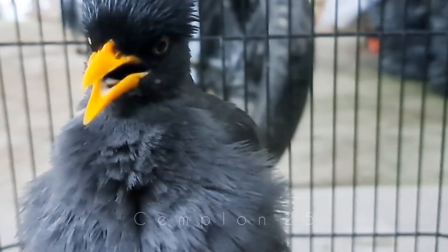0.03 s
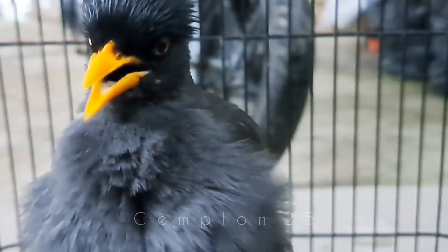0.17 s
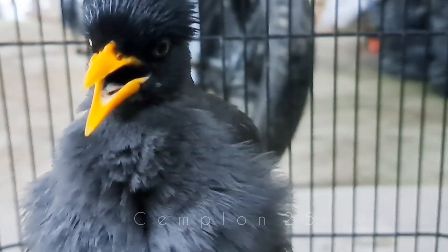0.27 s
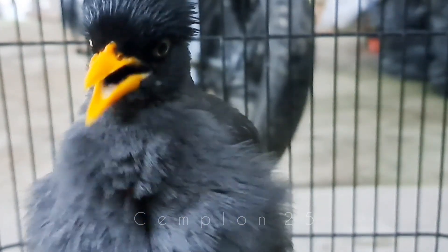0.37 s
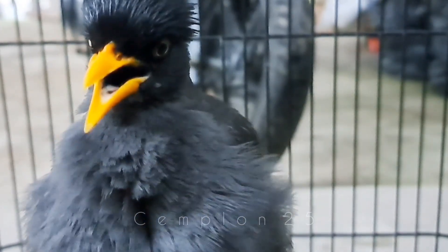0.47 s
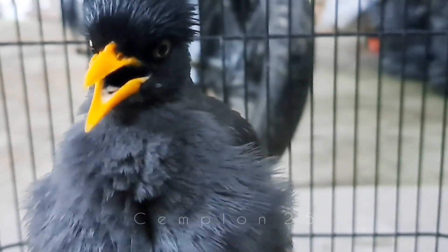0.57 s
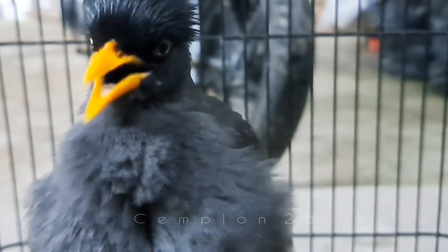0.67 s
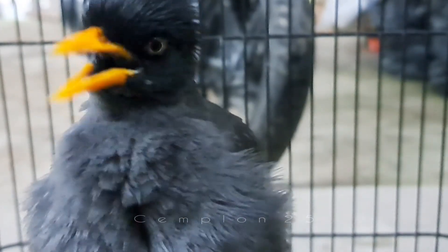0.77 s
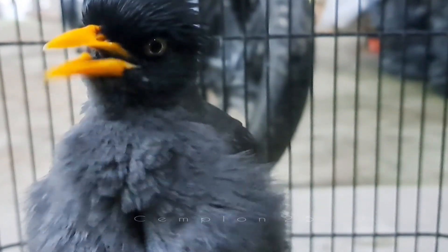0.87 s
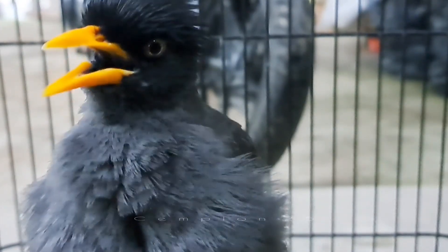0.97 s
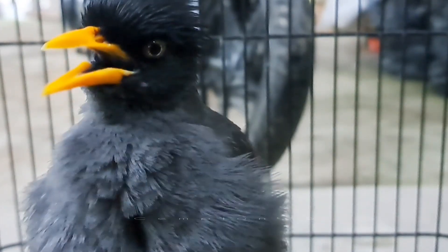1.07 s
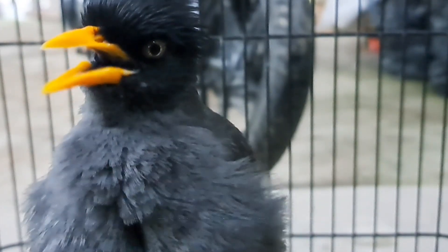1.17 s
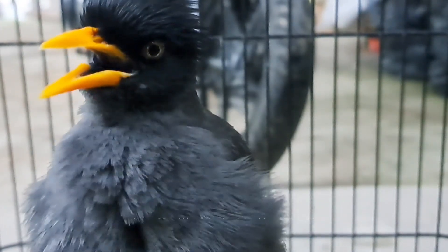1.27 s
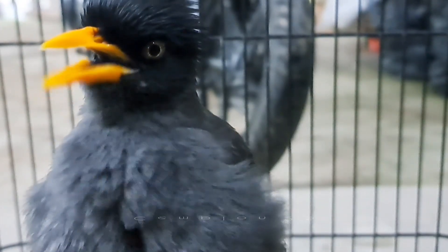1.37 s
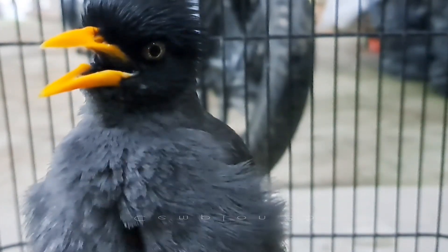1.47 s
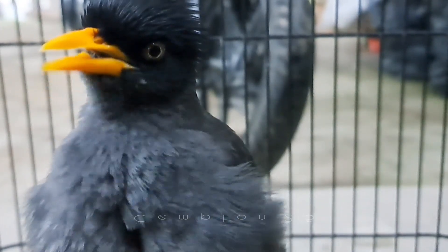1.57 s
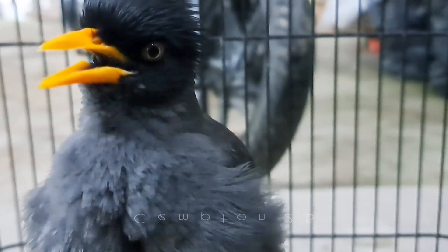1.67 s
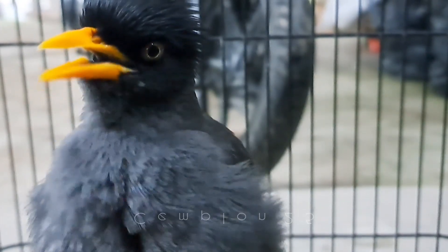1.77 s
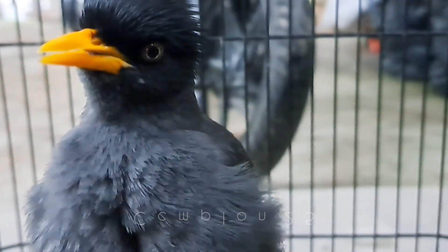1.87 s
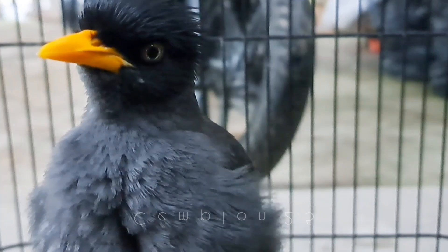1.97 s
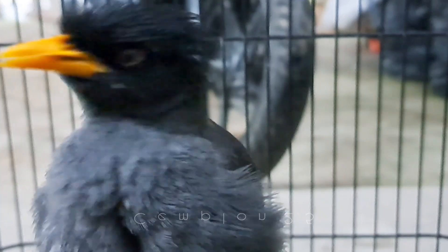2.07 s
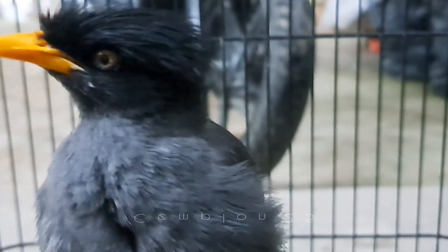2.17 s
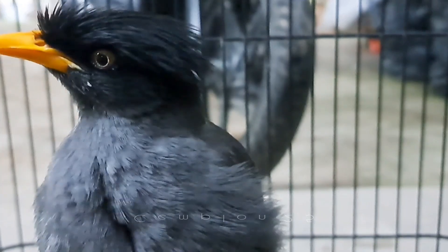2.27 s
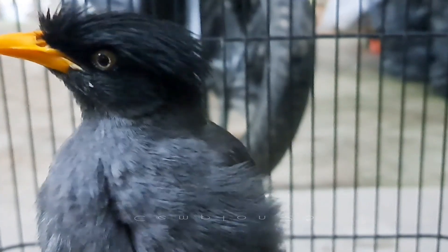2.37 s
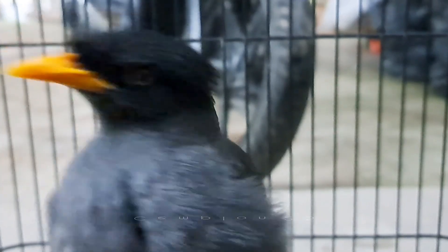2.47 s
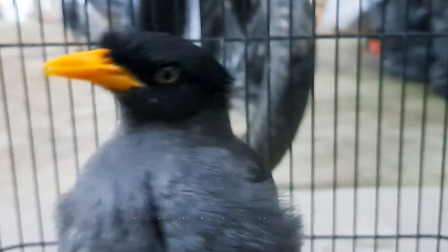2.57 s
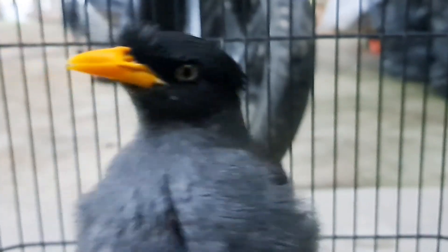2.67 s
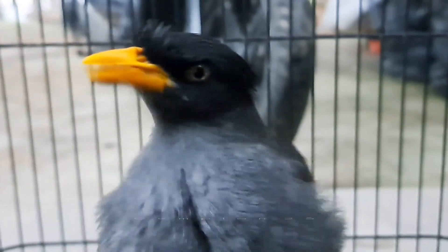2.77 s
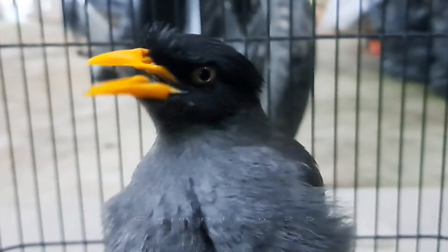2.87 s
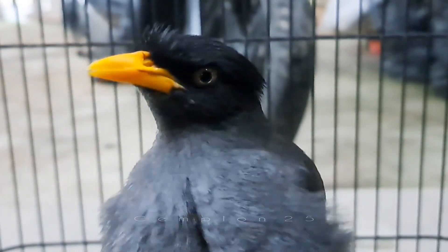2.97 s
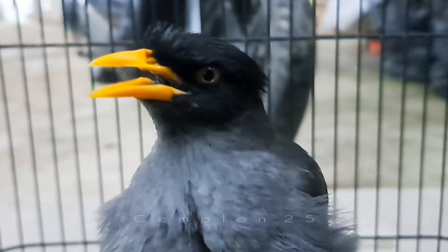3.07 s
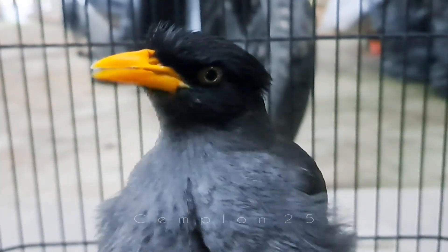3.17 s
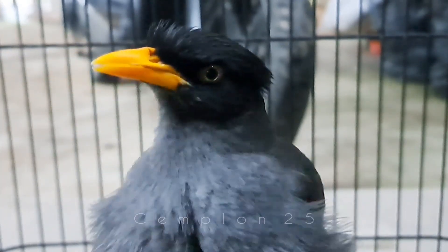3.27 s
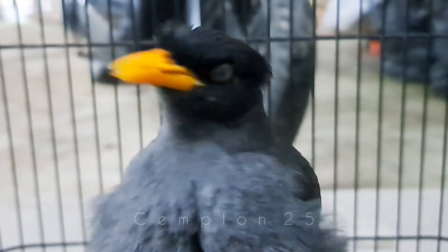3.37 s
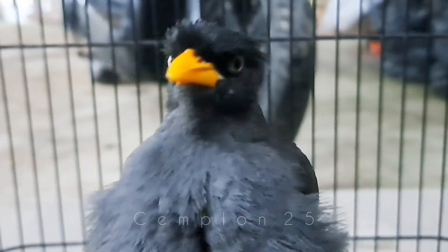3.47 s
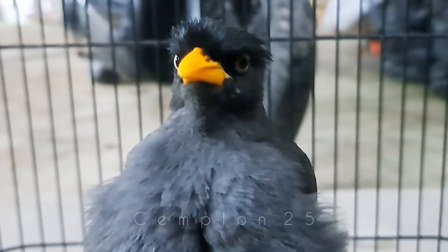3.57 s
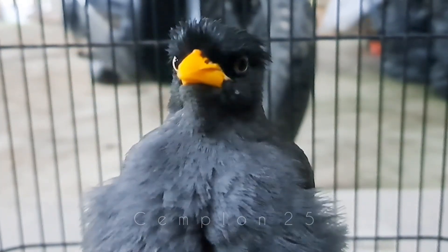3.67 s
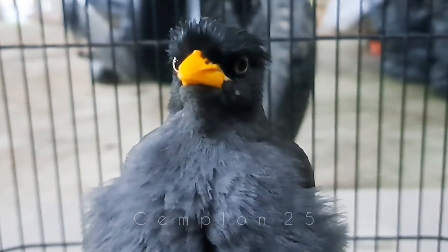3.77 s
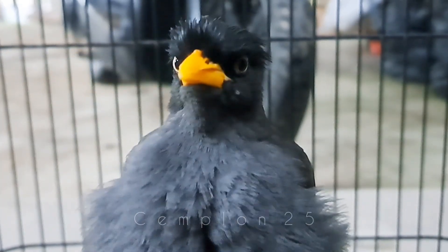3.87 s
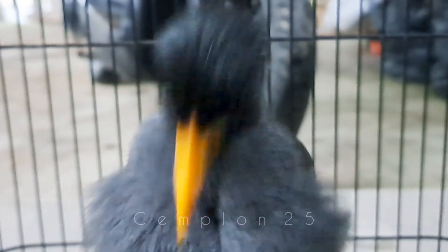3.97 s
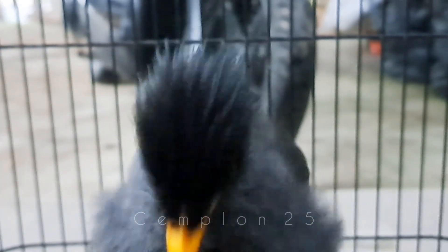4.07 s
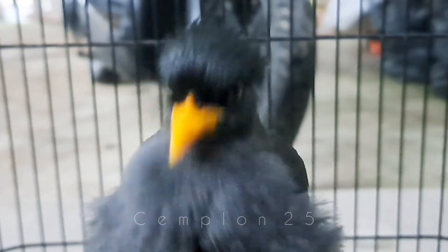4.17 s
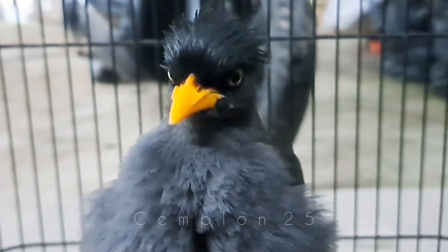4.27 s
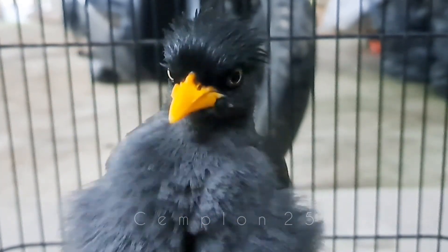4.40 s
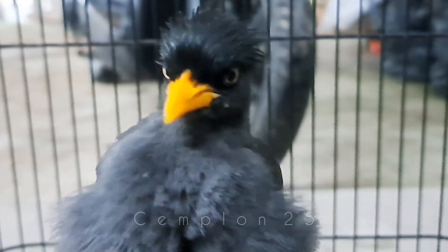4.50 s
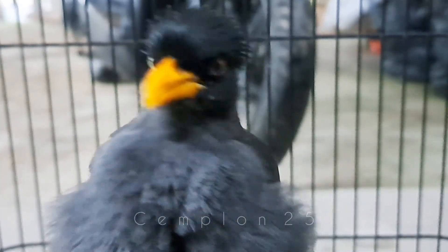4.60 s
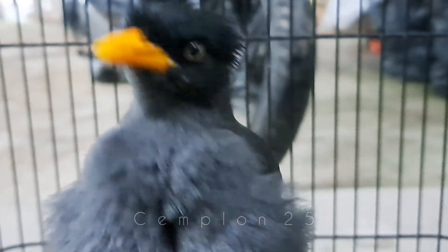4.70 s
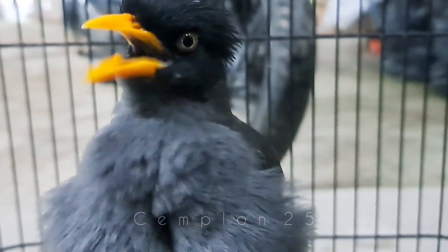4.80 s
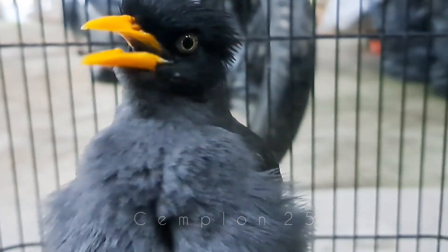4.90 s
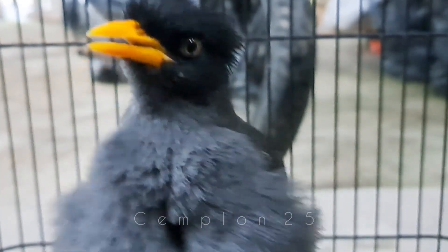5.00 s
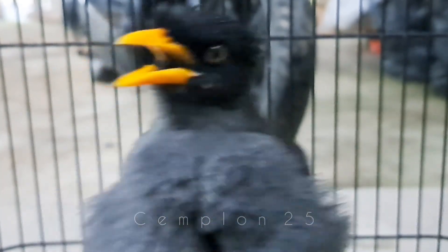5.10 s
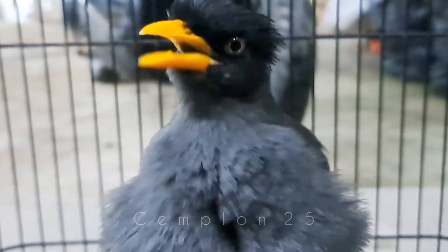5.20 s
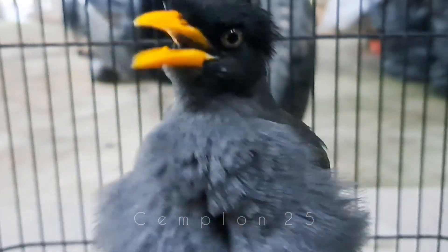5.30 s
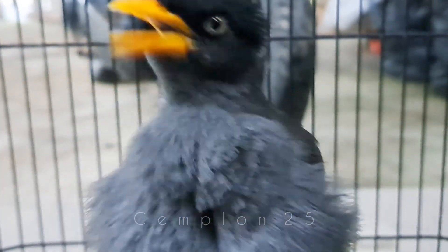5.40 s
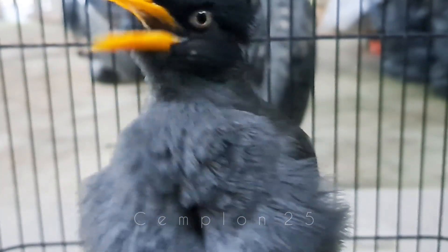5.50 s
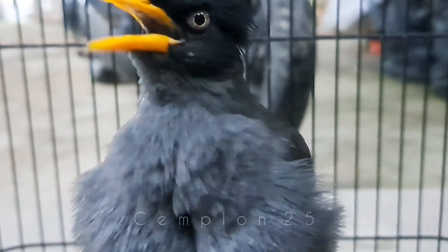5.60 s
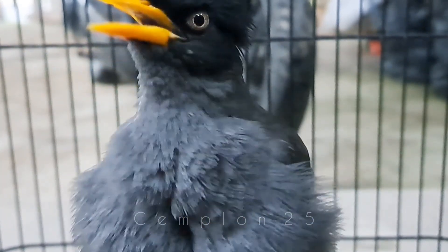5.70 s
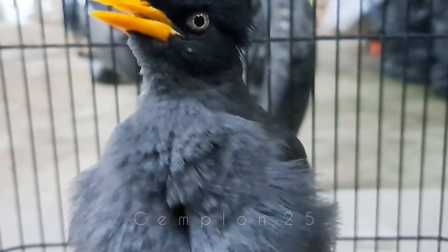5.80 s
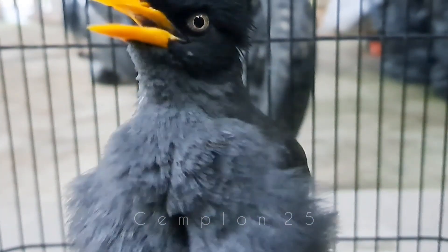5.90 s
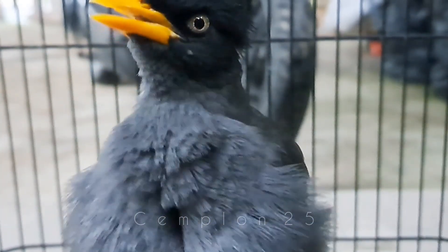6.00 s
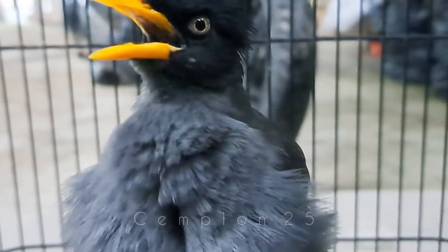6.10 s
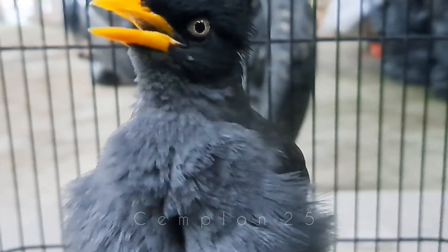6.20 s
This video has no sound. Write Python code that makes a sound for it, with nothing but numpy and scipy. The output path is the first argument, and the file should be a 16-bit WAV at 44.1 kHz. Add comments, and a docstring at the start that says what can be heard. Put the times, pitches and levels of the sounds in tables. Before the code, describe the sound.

Seven bright, nasal bird squawks, about four a second, slowly sinking in pitch, end in a quick trill. The near bird then only rattles clicks and warbles quietly, as another bird's buzzing chatter comes from further off to the right and grows louder. After a soft perch thud, the near bird returns with chirps and piercing up-and-down whistles. Close microphones, a reverberant room, low rumble and faint distant whistles.

```python
"""Caged myna and a chattering neighbour

A myna sings in a wire cage close to a pair of microphones: seven arched squawks, rattling clicks and a warble,
then loud swooping whistles. Each voice is a tone with overtones whose pitch and loudness follow tables.
A second bird, its pitch shaken fast, chatters harshly across the room between the loud phrases.
Decaying noise makes the echoes of cage and walls; a low hum and room noise lie underneath.
"""
import sys
import numpy as np
from scipy import signal
from scipy.fft import rfft, irfft
from scipy.io import wavfile
from scipy.ndimage import uniform_filter1d, map_coordinates

SR = 44100
rng = np.random.default_rng(int(sys.argv[2]) if len(sys.argv) > 2 else 0)


def transcribe(signal):
    """Save signal, clipped to [-1, 1], as a 16-bit WAV file at the path in sys.argv[1]."""
    frames = np.atleast_2d(signal).T
    limited = np.clip(frames, -1, 1)
    pcm = np.round(limited * 32767).astype(np.int16)
    wavfile.write(sys.argv[1], SR, pcm)


N = 275604
TOP_HZ = 16200  # upper limit of the sound


# arched squawks: [start t/s, length t/s, top f/Hz of the arch, rise t/s, crest t/s after the start,
# starting level/dB, starting treble level/dB, fundamental level/dB]
SQUAWKS = [(.016, 0.19, 2294, 0.031, 0.11, -14, -15.5, 0),
           (0.254, .1836, 2213, 0.017, .052, -13, -13.5, -2),
           (0.491, 0.19, 2139, 0.02, 0.036, -13.5, -11.5, -3.5),
           (.737, 0.19, 2131, 0.01974, 0.00276, -14, -11, -3),
           (0.977, .1876, 1939, .0155, .113, -14, -11.5, -5.5),
           (1.217, 0.17, 1790, 0.018, 0.071, -13, -10.5, -7),
           (1.437, 0.17, 1769, 0.01182, 0.14, -13, -10, -7.5)]
# how well the throat passes each overtone: [f/Hz, level/dB]
THROAT = [(900, 4), (1900, -1), (2800, 12), (3500, 7), (4500, -5), (5300, -7), (7000, -103)]
# treble of the squawks: [f/Hz, level/dB]
BEAK = [(3800, -17), (5200, -0.5), (6300, 5), (7500, -1.5), (8800, 4), (10400, -6), (11400, -4.5),
        (14000, -5), (16000, -17.5)]
# how strongly the throat passes a squawk's second harmonic: [f/Hz, level/dB]
THROAT_GAIN = [(1200, -11.5), (2000, -4), (2500, -0.5), (3200, 1.5), (3500, -3.5), (3780, 8), (4050, -5.5),
               (4280, 1.5), (4570, -7)]
# the pitch starts low by a share, sags either side of its crest and collapses just before the end
RISE_SHARE, SAG_PER_S2 = .52, 3.1
DROP_SHARE, DROP_LEAD_S, DROP_S = .72, .018, .006
# the loudness fades as the air runs out and flares as the membrane goes slack
FADE_DB_PER_S, TREBLE_FADE_DB_PER_S, SLACK_DB = 33.5, 11, 2.5


def squawk(start, length, top_hz, rise_s, crest_s, db, treble_db, fundamental_db,
           jitter=0.003, slack_jitter=0.022, weak_hz=1046.0):
    """An arch of pitch whose second harmonic meets the throat resonance; the slack membrane is rough at both ends."""
    i, gate = note(start, start + length, edge_s=0.00209)
    age = i / SR - start
    gate = gate * (1 - np.exp(-(i - i[0]) / SR / 0.0077))  # air pressure builds up
    rise = 1 - RISE_SHARE * np.exp(-age / rise_s)
    sag = 1 - SAG_PER_S2 * (age - crest_s) ** 2
    drop = DROP_SHARE / (1 + np.exp((length - DROP_LEAD_S - age) / DROP_S))
    hz = top_hz * rise * sag * (1 - drop)
    slack = np.clip(5 * (.92 - hz / hz.max()), 0, 1)  # the lower the pitch, the slacker
    throat_gain = shape(THROAT_GAIN, 2 * hz)
    drive = 1 / (1 + (weak_hz / hz) ** 3)  # low notes are weak
    hz = hz * (1 + (jitter + slack_jitter * slack) * walk(700, len(i)))
    phase = 2 * np.pi * np.cumsum(hz) / SR
    throat = throat_gain * overtones(hz, phase, THROAT)
    treble_gain = drive * undb(treble_db - TREBLE_FADE_DB_PER_S * age)
    treble = treble_gain * overtones(hz, phase, BEAK)
    fundamental = np.sqrt(2) * drive ** 1.25 * undb(fundamental_db) * np.sin(phase)
    voice = (throat + treble) * undb(SLACK_DB * slack) + fundamental
    return i, voice * gate * undb(db - FADE_DB_PER_S * age)


# fast pitch flutter of the whistles: [start t/s, end t/s, rate f/Hz, depth as share of pitch]
FLUTTER = [(1.668, 1.751, 137.7, 0.09), (4.55, 4.69, 150.6, 0.0415), (4.876, 4.927, 138, 0.079),
           (5.148, 5.204, 116.3, 0.056), (5.647, 5.75, 113.2, 0.13), (5.912, 5.985, 164.1, 0.095)]
# balance of a whistle's overtones: [f/Hz, level/dB]
OVERTONES = [(2500, 14), (5500, 4.5), (7500, 6.5), (10000, -6.5), (12000, 4), (16000, -15.5)]


def whistle(i, gate, hz, db, overtone_db, jitter=0.0076, flutter_jitter=0.288, tremor_db=2.56):
    """A fundamental with overtones; in places the syrinx (voice organ) flutters and the note turns harsh."""
    t = i / SR
    bend = jitter * walk(603, len(i))
    wobble, scatter = walk(60, len(i)), walk(900, len(i))
    for start, end, rate, depth in FLUTTER:
        inside = np.clip(np.minimum(t - start, end - t) / 0.0048, 0, 1)
        shake = np.sin(2 * np.pi * rate * (t - start) + 1.22 * wobble)
        bend += depth * inside * (shake + flutter_jitter * scatter)
    phase = 2 * np.pi * np.cumsum(hz * (1 + bend)) / SR
    upper = undb(overtone_db) * overtones(hz, phase, OVERTONES, count=7, rolloff=0.86)
    voice = np.sqrt(2) * np.sin(phase) + upper
    tremor = tremor_db * walk(220, len(i))  # the loudness trembles too
    return i, voice * gate * undb(db + tremor)


# a whistle carries best near the throat resonance; low notes are weak and rich in overtones:
# [pitch f/Hz, added level/dB, overtone level/dB]
REGISTER = [(600, -38, 3), (1220, -26.5, 15), (1680, -15.5, 1.5), (2110, -6.5, -9.5), (2377, -3.5, -21),
            (2924, -1.5, -14.5), (3250, -3.5, -18), (4260, -5, -20), (5550, -10, -25)]


def sing(i, gate, hz, db):
    """A whistle through the open beak: loudness and overtones follow the pitch."""
    pitch, gain_db, overtone_db = np.transpose(REGISTER)
    return whistle(i, gate, hz, db + np.interp(hz, pitch, gain_db), np.interp(hz, pitch, overtone_db))


# a phrase starts softly and reaches full strength as the air pressure builds
SOFT_START_DB = -10.5


def phrase(contour, db, swell_db_per_s, build_s):
    """One unbroken glide along a [t/s, f/Hz] contour; a soft start and a steady swell add to the pitch's loudness."""
    i, gate = note(contour[0][0], contour[-1][0], edge_s=.004)
    hz, = controls(contour, i / SR, smooth_s=0.0025)
    age = (i - i[0]) / SR
    return sing(i, gate, hz, db + swell_db_per_s * age + SOFT_START_DB * np.exp(-age / build_s))


# a swoop leaps up, climbs to a peak and dives: [share of its length, f/Hz]
SWOOP = [(0, 1660), (.05, 1890), (.085, 3400), (0.281, 3850), (.45, 5000), (0.552, 5550), (.645, 5050),
         (0.714, 3500), (0.789, 2700), (1, 2270)]
# swoops: [start t/s, length t/s, level/dB before REGISTER is added, swell in dB per s]
SWOOPS = [(5.353, .155, -11.5, 10), (6.098, .149, -11, 18)]
# the first swoop runs on into a second climb, a growling dive and a clear low note: [t/s, f/Hz]
FLOURISH = [(5.523, 2442), (5.587, 3830), (5.612, 5042), (5.638, 5116), (5.655, 3508), (5.69, 2003),
            (5.726, 1496), (5.752, 2190), (5.796, 2554), (5.815, 2414)]
SWOOP_BUILD_S = 0.026


def swoop(start, length, db, swell_db_per_s, ending):
    """The swoop's glide, stretched to its length and run on into its ending."""
    contour = [(start + share * length, hz) for share, hz in SWOOP] + ending
    return phrase(contour, db, swell_db_per_s, SWOOP_BUILD_S)


# quavering calls that settle on a clear note, one list each: [t/s, f/Hz]
QUAVERS = [
    [(1.666, 2145), (1.674, 1898), (1.687, 2532), (1.698, 1878), (1.706, 2907), (1.716, 2564),
     (1.738, 2439), (1.75, 2825), (1.806, 3005)],
    [(5.888, 585), (5.9, 1135), (5.908, 2260), (5.921, 3115), (5.929, 2347), (5.947, 1792), (5.959, 2400),
     (5.978, 2789), (6.004, 3023)],
]
QUAVER_DB, QUAVER_SWELL_DB_PER_S, QUAVER_BUILD_S = -8.5, -12, 0.0055  # level before REGISTER is added


def quaver(contour):
    """A call whose pitch jumps up and down quickly, then settles on a clear, stronger note."""
    return phrase(contour, QUAVER_DB, QUAVER_SWELL_DB_PER_S, QUAVER_BUILD_S)


# chirps of a high note, a dip and a held note: [start t/s, dip t/s, held note t/s, end t/s, high f/Hz,
# dip f/Hz, held f/Hz, level/dB before REGISTER is added, leap t/s after the start, held note's added level/dB]
CHIRPS = [(4.836, 4.882, 4.907, 4.953, 5064, 2182, 3260, -8, .018, 1.5),
          (5.105, 5.157, 5.178, 5.216, 3485, 2496, 3633, -14, .007, 3.5)]
LEAP_FROM_SHARE, STEP_S = 0.38, .008  # first pitch as share of the high note; smoothing time, used twice


def chirp(start, dip, held, end, high_hz, dip_hz, held_hz, db, leap_s, held_db, start_db=-3, dip_db=-4.5):
    """The pitch leaps to a high note, dips softly and comes up to a strong held one."""
    i, gate = note(start, end, edge_s=.005)
    part = np.searchsorted(np.sort([start + leap_s, dip, held]), i / SR)
    pitches = [LEAP_FROM_SHARE * high_hz, high_hz, dip_hz, held_hz]
    accents = [start_db, 0, dip_db, held_db]
    steps = np.array([pitches, accents])[:, part]
    glide = max(1, int(STEP_S * SR))
    hz, accent_db = uniform_filter1d(uniform_filter1d(steps, glide), glide)
    return sing(i, gate, hz, db + accent_db)


# yips: [start t/s, length t/s, low f/Hz, flick t/s after the start, flick height f/Hz, level/dB]
YIPS = [(4.474, 0.0081, 1303, 0.00098, 305, -25), (4.518, 0.0622, 1637, .037, 1450, -22.5),
        (4.637, 0.039, 1665, .019, 1400, -19)]


def yip(start, length, hz, flick_s, flick_hz, db, width_s=0.0055, overtone_db=-16):
    """A low note through the closed beak that flicks up once."""
    i, gate = note(start, start + length, edge_s=0.002)
    flick = flick_hz * np.exp(-((i / SR - start - flick_s) / width_s) ** 2)
    return whistle(i, gate, hz + flick, db, overtone_db)


def warble(start=3.29, length=.142, from_hz=1420.0, to_hz=2710.0, climb_s=.12, crest_s=0.019, rate_hz=26.0,
           quicken_hz_per_s=75.0, swing=0.261, db=-26, swell_db=9.0, overtone_db=-25):
    """A wide, quickening vibrato about a centre that climbs and swells, with the beak closed."""
    i, gate = note(start, start + length, edge_s=.005)
    age = i / SR - start
    climb = np.clip(age / climb_s, 0, 1)
    turns = rate_hz * (age - crest_s) + quicken_hz_per_s * (age - crest_s) ** 2 / 2
    depth = swing * np.clip(np.minimum(age, (length - age) / 2) / 0.0202, 0, 1)
    centre_hz = from_hz * (to_hz / from_hz) ** climb ** 1.45
    hz = centre_hz * (1 + depth * np.cos(2 * np.pi * turns))
    return whistle(i, gate, hz, db + swell_db * climb, overtone_db)


# which side each frequency leans to: [f/Hz, left minus right level/dB]
BALANCE_DB = [(800, -1), (1300, -4), (1800, -1), (2200, 6.5), (2520, 11.5), (2900, 0), (3350, 8.5),
              (3650, -3), (4000, 10.5), (4180, -2.5), (4400, 3), (4900, 0), (5400, -0.5), (16000, 5.5)]


def song():
    """The near bird's voiced notes added up, each frequency leaning to its own side."""
    notes = [squawk(*row) for row in SQUAWKS]
    notes += [quaver(contour) for contour in QUAVERS]
    notes += [warble()]
    notes += [yip(*row) for row in YIPS]
    notes += [chirp(*row) for row in CHIRPS]
    notes += [swoop(*SWOOPS[0], FLOURISH), swoop(*SWOOPS[1], [])]
    voice = np.zeros(N)
    for i, sound in notes:
        voice[i] += sound
    lean_db = 20 * np.log10(shape(BALANCE_DB, np.fft.rfftfreq(N, 1 / SR)))
    return irfft(pan(rfft(voice), lean_db), N)


# throat clicks, in threes: [t/s, level/dB before a common cut, added treble level/dB]
CLICKS = [(2.651, -18.5, -11.5), (2.6763, -10, -6), (2.6993, -12.5, -1), (2.8636, -11.5, 2.5),
          (2.8897, -11, 7), (2.9129, -11, 6.5), (3.098, -9, 3.5), (3.1223, -8.5, 7), (3.1446, -8.5, 5.5)]
# what a click rings in the throat and beak: [f/Hz, level/dB, t/s to die by 60 dB]
CLICK_MODES = [(378, -12.5, 0.0078), (1349, -2.5, 0.0098), (2498, 1, 0.015), (2740, 2.5, 0.0062),
               (3898, -3.5, 0.0049), (5098, -12.5, 0.0087), (6620, -8, 0.0044), (7800, -9, 0.00276),
               (11000, -12, 0.0025), (14700, -26.5, .006)]


def click(start, db, treble_db, pan_db=3):
    """One snap of the syrinx rings the throat for a few milliseconds."""
    t = np.arange(SR // 40) / SR
    ring = np.zeros(len(t))
    for k, (hz, mode_db, t60) in enumerate(CLICK_MODES):
        fading_db = mode_db + treble_db * (hz > 2000) - 60 * t / t60
        ring += undb(fading_db) * np.sin(2 * np.pi * hz * t) * (-1) ** k
    return int(start * SR) + np.arange(len(t)), pan(undb(db - 3.5) * ring, pan_db)  # 3.5 dB common cut


# ringing of the perch and cage frame: [f/Hz, level/dB, t/s to die by 60 dB]
PERCH_MODES = [(267, 3.5, 0.22), (340, 8.5, 0.25), (392, -5.5, 0.89), (438, 11, 0.191), (496, -7, 0.2),
               (534, 3, 0.233), (710.4, 3, 0.128), (855, 1, 0.162), (1045.6, 3.5, 0.167), (1260, 10, 0.18)]


def thud(start=4.078, db=-43, rustle_db=-39, rustle_t60=0.47):
    """The perch knocks (fading tones) and feathers rustle (fading noise) as the bird flicks its head down."""
    i = np.arange(int(start * SR), int((start + .5) * SR))
    age = (i - i[0]) / SR
    ring = np.zeros(len(i))
    for hz, mode_db, t60 in PERCH_MODES:
        ring += undb(mode_db - 60 * age / t60) * np.sin(2 * np.pi * (hz * age + rng.random()))
    feathers = noise([(100, -17.5), (250, -0.5), (1100, -2.5), (2000, -12), (16000, -30.5)])[i]
    rustle = feathers * undb(rustle_db - 60 * age / rustle_t60)
    return i, pan((undb(db) * ring + rustle) * np.minimum(age / 0.0015, 1), 0)


PORT_LAG_S = 0.00021  # the right microphone hears the direct sound this much later


def near_bird(dry, room_db=-16.0, room_pan_db=-7.5, early_db=-15, cage_db=-21):
    """Direct sound reaches the left first; the cage answers at once, then the nearest walls; the room rings on."""
    late_right = map_coordinates(dry[1], [np.arange(N) - PORT_LAG_S * SR], order=3)
    direct = np.array([dry[0], late_right])
    source = dry.mean(axis=0)
    cage = undb(cage_db) * reverberate(source, t60=0.016, treble_t60=0.036, treble_db=17.5, gap_s=0.00017)
    early = undb(early_db) * reverberate(source, t60=0.197, treble_t60=0.14, treble_db=5.5, gap_s=0.0059)
    room = undb(room_db) * reverberate(source, t60=0.46, treble_t60=0.56, treble_db=-3.0)
    return direct + cage + early + pan(room, room_pan_db)


# balance of the second bird's overtones: [f/Hz, level/dB]
CHATTER_OVERTONES = [(4000, 10), (5800, 6.5), (7400, 0.5), (9000, -3.5), (10600, -6.5), (12500, -1.5),
                     (16000, -10)]
# every note swells in, fades and dies away, its buzz deepening as it goes
CHATTER_ATTACK_S, CHATTER_RELEASE_S, CHATTER_FADE_DB, BUZZ_GROWTH = .018, 0.017, 2.5, 0.48


def chatter_note(start, length, from_hz, to_hz, db, overtone_db, depth, buzz_hz=169.0, unevenness=.35,
                 chaos=0.1755, jitter=0.00562):
    """The pitch slides and shakes fast and unevenly, spreading the note and its overtones into harsh bands."""
    i = np.arange(int((start - CHATTER_ATTACK_S / 2) * SR), int((start + length + CHATTER_RELEASE_S) * SR))
    age = i / SR - start
    along = np.clip(age / length, 0, 1)
    attack = age / CHATTER_ATTACK_S + .5
    release = 1 - (age - length) / CHATTER_RELEASE_S
    gate = np.clip(np.minimum(attack, release), 0, 1)
    hz = from_hz + (to_hz - from_hz) * along
    shake = np.sin(2 * np.pi * np.cumsum(buzz_hz * (1 + unevenness * walk(120, len(i)))) / SR)
    depth = depth * (1 + BUZZ_GROWTH * (along - .5))
    shaken_hz = hz * (1 + depth * (shake + chaos * walk(1100, len(i))) + jitter * walk(508, len(i)))
    phase = 2 * np.pi * np.cumsum(shaken_hz) / SR
    upper = undb(overtone_db) * overtones(hz, phase, CHATTER_OVERTONES, count=8)
    return i, np.sqrt(2) * np.sin(phase) + upper, gate * undb(db - CHATTER_FADE_DB * along)


# the second bird's notes: [start t/s, length t/s, first f/Hz, last f/Hz, starting level/dB,
# overtone level/dB against the note, buzz depth midway as share of pitch]
CHATTER = [(1.81, 0.075, 3950, 3150, -34, -6.5, 0.384), (1.927, 0.079, 3973, 3292, -31.5, -9, 0.18),
           (2.024, .11, 2726, 1942, -34.5, -13, .25), (2.21, 0.065, 3225, 3190, -31.5, -6, 0.0888),
           (2.293, 0.071, 3163, 2741, -34.5, -3, 0.32), (2.431, 0.056, 3773, 3850, -31.5, -10, 0.14),
           (2.494, 0.1, 2750, 2192, -33, -16.5, 0.15), (2.617, 0.15, 3585, 3106, -30, -16, 0.1546),
           (2.825, 0.037, 4820, 4390, -32.5, -23.5, 0.174), (2.914, .05, 3700, 3270, -32, -14, 0.175),
           (2.97, 0.078, 3208, 2713, -33.5, -10, 0.222), (3.48, .09, 3316, 3000, -27.5, -21.5, .11),
           (3.779, 0.0489, 3404, 3590, -24.5, -12.5, 0.055), (3.832, 0.0645, 3615, 2677, -23.5, -13, .24),
           (3.915, 0.1, 2493, 2358, -29.5, -18.5, .23), (4.088, .045, 3360, 3000, -28.5, -9, 0.245),
           (4.14, .055, 2950, 2755, -26, -6, .15), (4.204, 0.021, 3220, 3299, -21, -15, 0.11),
           (4.276, 0.092, 4313, 4320, -22, -7.5, 0.1885), (4.378, 0.099, 2906, 2851, -23.5, -12, 0.163),
           (4.486, 0.091, 3166, 3200, -21.5, -15, 0.18), (4.621, 0.13, 2852, 3127, -21.5, -14, 0.19),
           (4.737, 0.0447, 3909, 3908, -15.5, -19, 0.043)]
# balance of its air noise: [f/Hz, level/dB]
CHATTER_AIR = [(600, 1.5), (1200, -3), (1700, 10.5), (3600, 1), (5200, 14.5), (6300, -59), (9000, -64),
               (16000, -70)]


def chatter(air_db=-21):
    """Harsh chatter: buzzing notes, each with a little air noise."""
    voice, air = np.zeros(N), undb(air_db) * noise(CHATTER_AIR)
    for row in CHATTER:
        i, tone, envelope = chatter_note(*row)
        voice[i] += (tone + air[i]) * envelope
    return voice


def far_bird(voice, direct_db=-7, room_db=0.5, pan_db=-5):
    """Off to the right and further away, heard mostly by way of the walls."""
    room = reverberate(voice, t60=0.49, treble_t60=0.38, treble_db=-1.0)
    return pan(undb(direct_db) * voice + undb(room_db) * room, pan_db)


# faint whistles of birds further off, one list each: [t/s, f/Hz, level/dB]
FAR_CALLS = [
    [(.35, 1580, -50), (.43, 1860, -43), (.5, 1850, -45)],
    [(2.06, 1356, -50), (2.2, 1440, -51.5), (2.38, 1490, -47)],
    [(6.15, 1320, -51), (6.2, 1336, -40), (6.25, 1420, -53)],
]


def far_call(rows):
    """A faint gliding whistle: one slightly unsteady sine wave, off to the right."""
    i, gate = note(rows[0][0], rows[-1][0], edge_s=0.011)
    hz, db = controls(rows, i / SR, smooth_s=0.019)
    phase = 2 * np.pi * np.cumsum(hz * (1 + 0.0054 * walk(157, len(i)))) / SR
    return i, pan(gate * undb(db) * np.sin(phase), -8.0)


# balance of the low room noise: [f/Hz, level/dB per Hz]
ROOM_NOISE = [(20, -34), (30, -15), (40, 1), (65, 4.5), (90, -3), (140, -2), (220, -9), (400, -14),
              (800, -17.5), (1500, -22), (4000, -29), (10000, -41), (16000, -45)]
# the room noise rises and falls: [t/s, level/dB]
ROOM_LEVEL = [(0, -47), (1.3, -51.5), (1.9, -55.5), (3.1, -54.5), (4.4, -47), (5.2, -50), (6.25, -54)]
# swells of the hum: [start t/s, end t/s, f/Hz, level/dB]
HUM = [(0, 0.303, 128.5, -55), (0.841, 1.65, 135, -51.5), (3.103, 4.45, 126.8, -50)]
# a brief higher drone at the beginning: [f/Hz, level/dB]
DRONE = [(183, -49.5), (221, -50.5)]
HUM_HZ, HUM_DB, HUM_SWELL_S = 124.2, -60.5, 0.082


def background(side_db=-14):
    """Low room noise, nearly the same on both sides, with a swelling hum and a brief drone."""
    t = clock()
    hum = wavering(HUM_HZ, HUM_DB)
    for start, end, hz, db in HUM:
        hum = hum + wavering(hz, db) * np.clip(np.minimum(t - start, end - t) / HUM_SWELL_S + .5, 0, 1)
    drone = sum(wavering(hz, db) for hz, db in DRONE) * np.interp(t, [.18, .34], [1, 0])
    # a second, weaker noise with opposite sign left and right
    air = noise(ROOM_NOISE) + undb(side_db) * noise(ROOM_NOISE) * np.array([[1], [-1]])
    air_db, = controls(ROOM_LEVEL, t, smooth_s=0.13)
    return hum + drone + air * undb(air_db)


def wavering(hz, db, waver_db=2.0, drift=0.0298):
    """A low tone that wanders in pitch and level."""
    level = undb(db + waver_db * walk(10, N))
    phase = 2 * np.pi * np.cumsum(hz * (1 + drift * walk(23, N))) / SR
    return np.sqrt(2) * level * np.sin(phase)


def reverberate(x, t60, treble_t60, treble_db, gap_s=0.0017):
    """Dense reflections as fading noise, different on each side; the treble has its own level and fade."""
    t = np.arange(SR) / SR
    reflections = rng.standard_normal((2, SR))
    low_gain = shape([(4500, -3.0), (8000, -15), (16000, -31.5)], np.fft.rfftfreq(SR, 1 / SR))
    low = irfft(rfft(reflections) * low_gain, SR)
    treble = (reflections - low) * undb(treble_db - 60 * t / treble_t60)
    response = (low * undb(-60 * t / t60) + treble) * (t > gap_s)
    response /= np.linalg.norm(undb(-60 * t / t60))  # evens out the loudness of long and short fades
    return signal.fftconvolve(x[None], response, axes=1)[:, :N]


def overtones(hz, phase, spectrum, count=18, rolloff=0):
    """Harmonics above the fundamental, weighted by a spectrum, rms 1."""
    k = np.arange(2, count)[:, None]
    below_top = np.clip((TOP_HZ + 1000 - k * hz) / 1000, 0, 1)
    weights = shape(spectrum, k * hz) / k ** rolloff * below_top
    total = np.sum(weights * np.sin(k * phase), axis=0)
    return np.sqrt(2) * total / np.sqrt(np.sum(weights ** 2, axis=0) + 1e-12)


def note(start, end, edge_s):
    """Sample numbers of a note and its soft-edged gate."""
    start, end = start - edge_s, end + edge_s
    i = np.arange(max(0, int(start * SR)), min(N, int(end * SR)))
    edge = np.clip(np.minimum(i / SR - start, end - i / SR) / edge_s, 0, 1)
    return i, np.sin(np.pi / 2 * edge) ** 2


def controls(rows, t, smooth_s):
    """Columns of a curve at times t, corners rounded as muscles would."""
    s, *columns = np.transpose(rows)
    width = max(1, int(smooth_s * SR))
    return [uniform_filter1d(np.interp(t, s, column), width) for column in columns]


def walk(rate, size):
    """Random wander with about `rate` new values a second, spread near 1."""
    steps = np.arange(size) * rate / SR
    return 1.295 * np.interp(steps, np.arange(size), rng.standard_normal(size))


def pan(x, db):
    """Spread over two channels at constant power; positive dB leans left."""
    gains = np.array([undb(db / 2), undb(-db / 2)]).reshape(2, -1)
    return x * gains / np.sqrt(np.mean(gains ** 2, axis=0))


def noise(points):
    """Noise with the given spectrum, rms 1."""
    return unit(irfft(rfft(rng.standard_normal(N)) * shape(points, np.fft.rfftfreq(N, 1 / SR)), N))


def shape(points, hz):
    """Gain of a [f/Hz, level/dB] spectrum at the given frequencies."""
    f, db = np.transpose(points)
    return undb(np.interp(np.log(np.maximum(hz, 1)), np.log(f), db))


def unit(x):
    """Scale to rms 1."""
    return x / np.sqrt(np.mean(x ** 2))


def undb(db):
    """Decibels to gain."""
    return 10 ** (np.asarray(db) / 20)


def clock():
    """Time of every sample in seconds."""
    return np.arange(N) / SR


def scene():
    """Both birds in the room, over the background."""
    dry = song()
    for i, sound in [*(click(*row) for row in CLICKS), thud(), *map(far_call, FAR_CALLS)]:
        dry[:, i] += sound
    return near_bird(dry) + far_bird(chatter()) + background()


def record(dry):
    """Round off the highest peaks, then cut everything above the top frequency."""
    rounded = dry / (1 + (np.abs(dry) / .95) ** 6) ** (1 / 6)
    return signal.sosfilt(signal.ellip(10, .2, 80, TOP_HZ, fs=SR, output="sos"), rounded)


dry = scene()
out = record(dry)
transcribe(out)
```